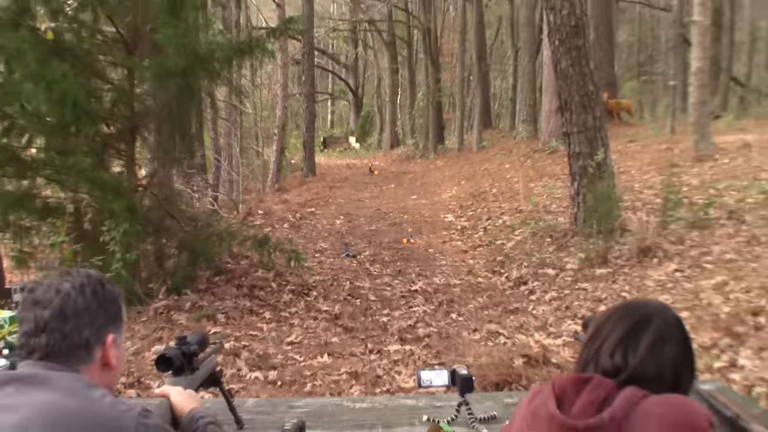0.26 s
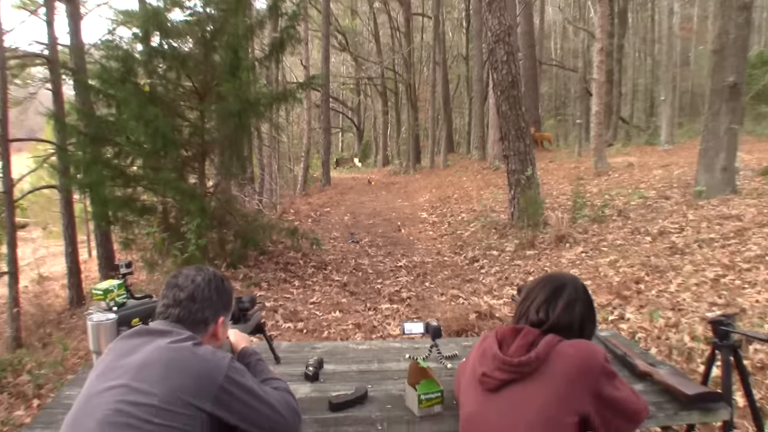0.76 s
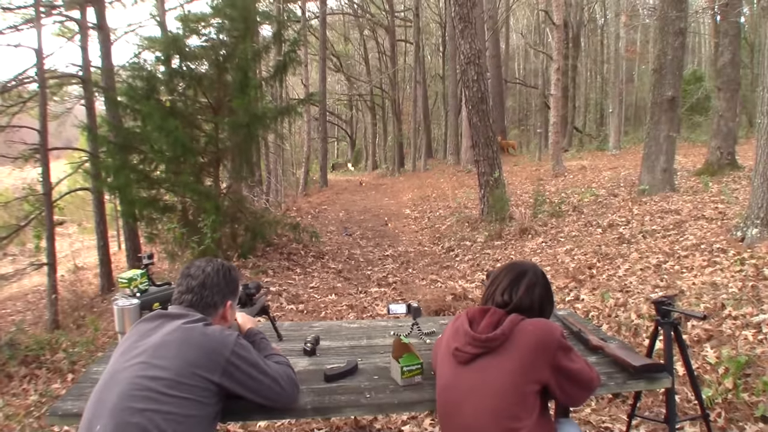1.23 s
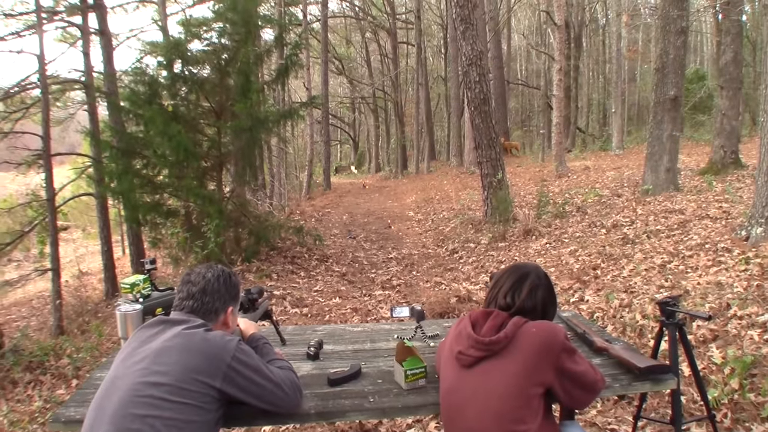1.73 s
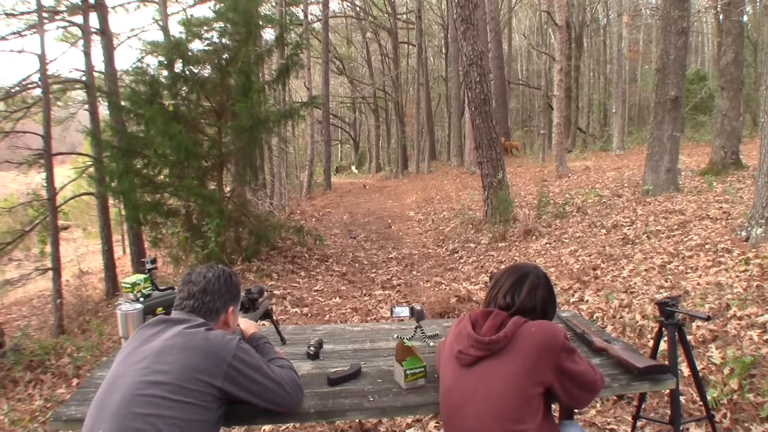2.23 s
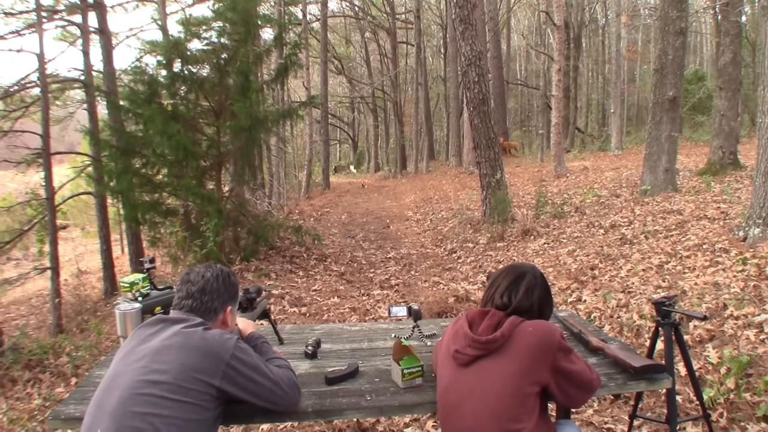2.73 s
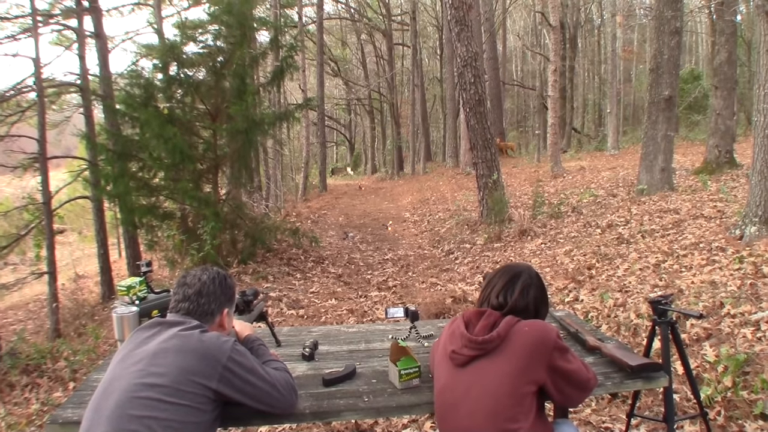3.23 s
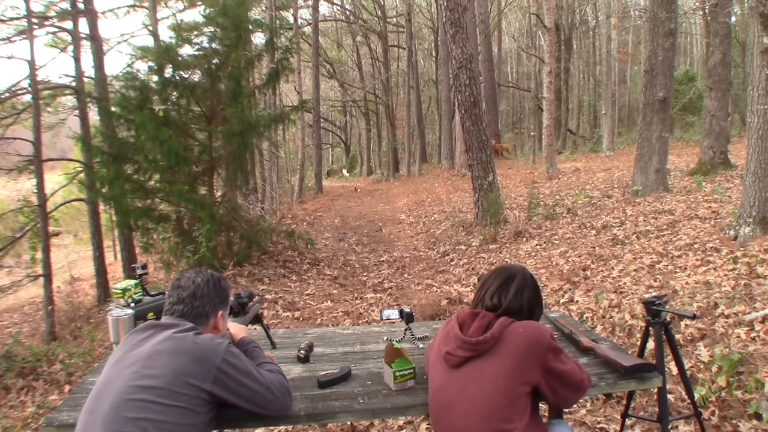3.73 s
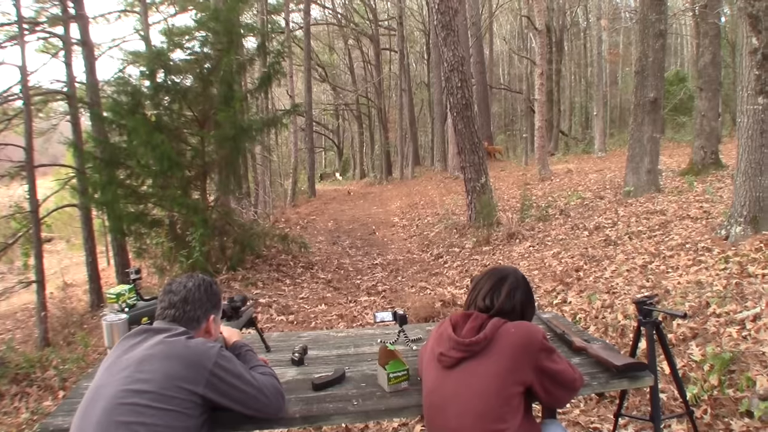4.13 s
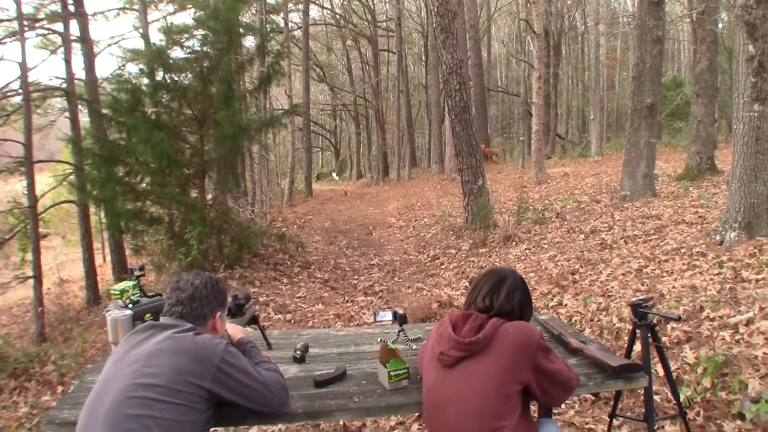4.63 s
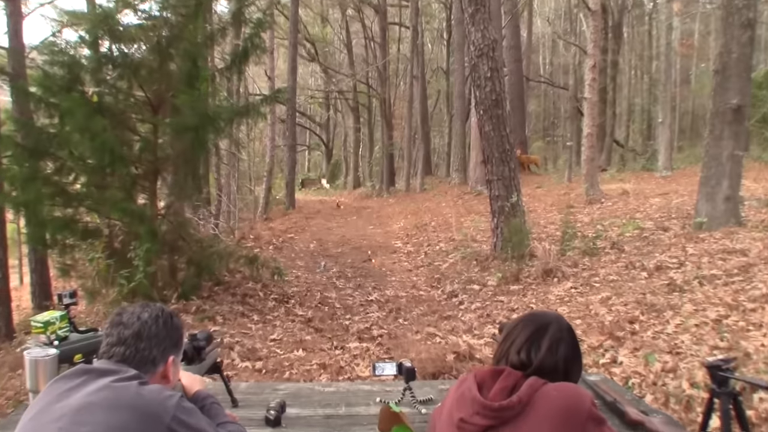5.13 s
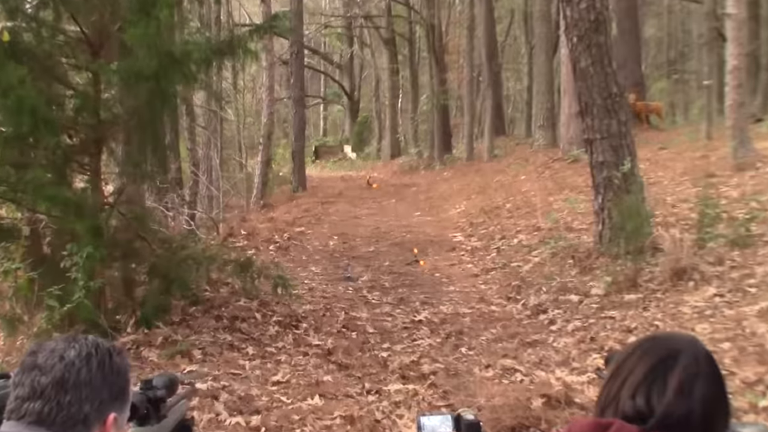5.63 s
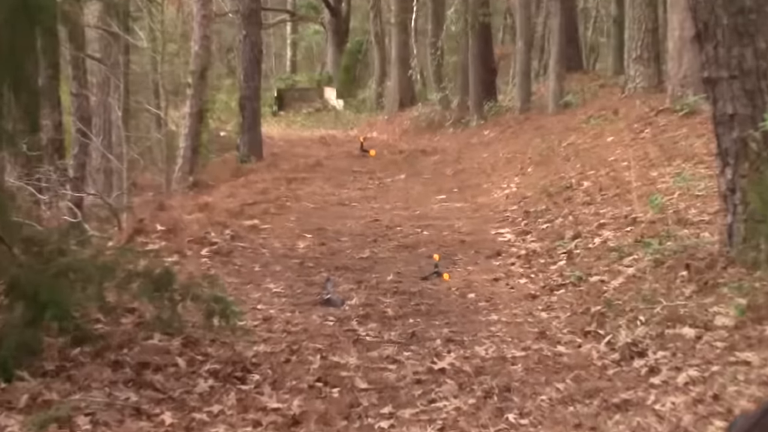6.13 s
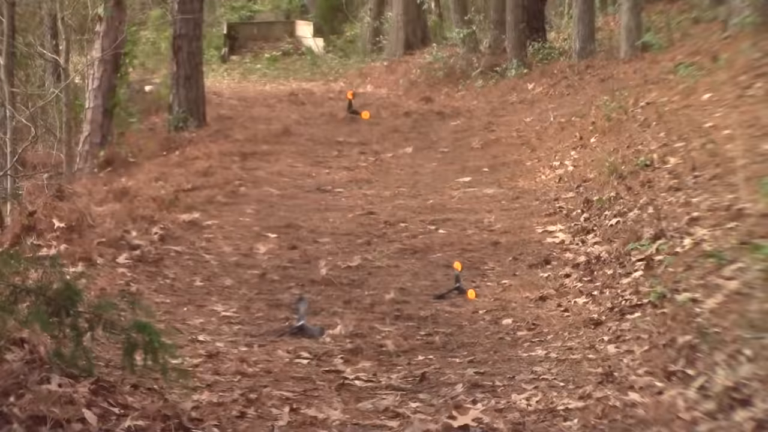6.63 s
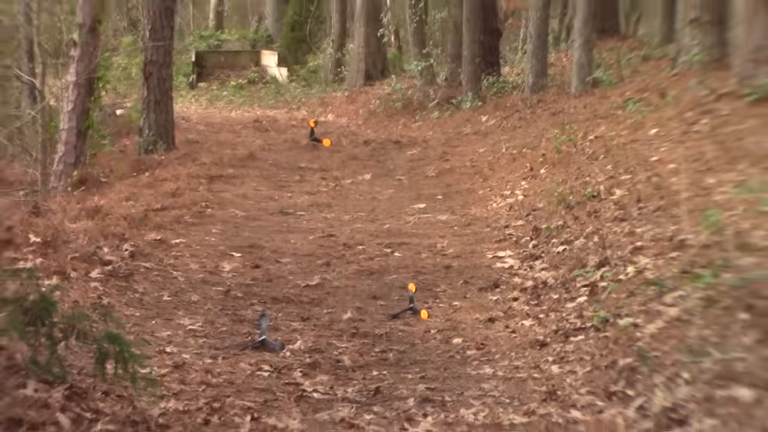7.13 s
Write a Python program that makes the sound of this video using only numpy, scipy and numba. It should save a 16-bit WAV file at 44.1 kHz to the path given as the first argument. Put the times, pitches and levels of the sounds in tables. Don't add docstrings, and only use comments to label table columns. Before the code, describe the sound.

Two small rifles crack irregularly in open woods, most shots answered by a bright steel ring and a rattling wash of tree echoes.

```python
import sys
import numpy as np
from scipy import signal
from scipy.io import wavfile
from scipy.ndimage import uniform_filter1d, minimum_filter1d
from numba import njit

SR = 44100
rng = np.random.default_rng(int(sys.argv[2]) if len(sys.argv) > 2 else 0)


def makeup_ratio(level_db):
    decades = np.asarray(level_db, float) / 20
    return 10 ** decades


def wav_out(sig):
    wavfile.write(sys.argv[1], SR, np.round(np.clip(np.atleast_2d(sig).T, -1, 1) * 32767).astype(np.int16))


N = 325017
AGE = np.arange(SR) / SR
LEAD = SR
DUCK_DB, RECOVER_S = 22, 0.27

# t/s, blast level/dB, woods level/dB, woods treble/dB
FIRST_SHOTS = [(0.341, -2, -0.5, 2.5), (1.388, -2, -0.5, -5.5), (2.4083, -0.5, 1, -2),
               (3.107, -2.5, -3, -2.5), (4.2760, -2, 0.5, -0.9), (4.5302, -4.5, 4, -7),
               (4.7600, -1.5, 2, -1.3), (5.3685, -2, 2, -2.6), (5.7456, -2, 1.5, -1.3),
               (6.9576, -2.5, 1.5, -1)]
SECOND_SHOTS = [(2.8146, 0.11, 0.087, 0.023), (5.0760, 0.0054, 0, -3.4), (6.389, 0.1, 0.2, 1)]
EARLIER_SHOT = (-0.995, 0, 0.23, .3)
# t from thump/ms, length/ms, f/Hz, width/Hz, level/dB
FIRST_BURSTS = [
    (-6.5, 2, 1200, 4000, -6),
    (-4, 1.8, 5200, 22000, 10),
    (-6, 15.2, 810, 2000, -7.5),
    (11.5, 41, 1100, 6200, -19),
    (15, 45, 6900, 3500, -50),
]
SECOND_BURSTS = [
    (-8.5, 5.3, 2700, 4400, -16),
    (-5, 3.1, 6000, 3800, 6.5),
    (-6.5, 15, 650, 1800, -8),
    (19.5, 18, 3600, 2300, -19.5),
    (22, 22, 7200, 1500, -22),
]
# f/Hz, level/dB, length/s
FIRST_THUMP = [(283.3, -0.5, 0.0084), (250, -17, 0.019), (611.5, -3, 0.0087), (1366, -9.5, 0.0045),
               (108, -27, 0.011)]
SECOND_THUMP = [(275, -1.5, 0.0063), (248.7, -17, 0.02), (559, -6.5, 0.0082), (1090, -5, 0.0045),
                (133, -15, 0.0061)]
# t after thump/s, girth level/dB, bright minus dull/dB
TRUNKS = [(.0145, 1, -2), (.0242, -7.5, -19), (.0368, -3, -13), (.048, 12, -2), (.0548, -1.5, -11),
          (.0671, -12, -7), (.083, 4.5, -3), (.088, -2, -4), (.0998, -17, 14), (.1104, 1, 2),
          (0.1186, -10, 16), (.1222, -0.5, 0.5), (.1294, 2, 0), (0.135, 0.5, -1.5), (.1529, 6.5, 1.5),
          (0.1826, 8.5, -0.5), (.196, 1, 11), (.2273, 4.5, 2), (.2388, 6.5, 4.5), (.244, 2.5, -2),
          (.2487, -12, -1), (.269, 5.5, -8), (.281, 3.5, -9), (.2935, -1, 5), (.3135, 4, -1),
          (.32, -7, -25.5), (.352, -0.5, -11), (.389, -1.5, -13), (.418, 6.5, -6.5), (.445, 2, 1)]
# f/Hz, width/Hz, level/dB, share of the trunk's tilt
TRUNK_BANDS = [
    (1044, 660, 0.5, -0.82),
    (2182, 890, 4, -0.11),
    (3740, 2020, -1, 0.54),
]
NEAR_TRUNK_DB, FARTHER_DB_PER_S = -7.5, -74
TRUNK_SPREAD_S, WIDER_PER_S = .0028, .01
# f/Hz, level/dB, t60/s
LEFT_A = [(2236, -20, .65), (3871, -25, .6), (7750, -29, .2), (7926, -18, .27), (8000, -31, .35),
          (8167, -32, .27), (9280, -19, .22), (9428, -33, .3), (11100, -31, .15), (11620, -43, .28),
          (13215, -37, .23)]
LEFT_B = [(3703, -31, .33), (3705, -33, 1.3), (5923, -23, .33), (5948, -23, .4), (7114, -33, .45),
          (7756, -25, .23), (7928, -32, .45), (8290, -37, .4), (9292, -43, .34), (10662, -35, .25),
          (13230, -40, .21)]
LEFT_C = [(2231, -21, .75), (3875, -29, .65), (5638, -25, .36), (5941, -29, .5), (7751, -31, .25),
          (7926, -24, .3), (8009, -37, .45), (8170, -38, .45), (9287, -15, .21), (9433, -32, .32),
          (11115, -27, .24), (11612, -38, .33), (12005, -35, .3), (13237, -34, .3)]
RIGHT_A = [(2067, -25, .7), (2298, -20, .78), (5696, -38, .78), (6031, -13, .33), (8050, -29, .33),
           (8152, -30, .42), (8308, -23, .4), (9446, -31, .41), (9601, -28, .21), (10957, -21, .29),
           (11858, -32, .29), (12238, -33, .42), (13428, -32, .5), (14749, -38, .5)]
RIGHT_B = [(2271, -24, .78), (2298, -23, .7), (3946, -26, .6), (5693, -32, .78), (5960, -27, .52),
           (7845, -18, .35), (8077, -32, .78), (9429, -15, .23), (9592, -18, .21), (10853, -17, .21),
           (11839, -21, .24), (13428, -31, .25), (13587, -27, .27), (14824, -33, .25)]
RIGHT_C = [(2298, -28, .7), (8061, -23, .5), (8322, -26, .21), (9603, -40, .37), (13596, -36, .4),
           (14751, -41, .36), (14862, -44, .3)]
SOIL = []
# t/s, splash level/dB, paddle, ring level/dB, f favoured by the spot/Hz, its boost/dB
STRIKES = [(.3986, 2.5, LEFT_A, -1.5, 7923, 1), (1.4483, -0.5, LEFT_B, 0, 5923, 6.5),
           (2.4668, -8.5, LEFT_B, -4, 5951, 6), (2.864, -4, RIGHT_A, -0.5, 6031, -0.3),
           (3.1683, -1, LEFT_C, -1.5, 7751, 10.5), (4.3356, -5, LEFT_A, -4.5, 7750, 21),
           (4.5903, -15.5, SOIL, 0, 0, 0), (5.1278, -3.5, RIGHT_B, -0.7, 9429, 0.5),
           (5.4268, -10, SOIL, 0, 0, 0), (5.8048, 4, LEFT_C, -4, 2238, 2.5),
           (6.439, -16, RIGHT_C, 1.7, 8055, -3), (7.0176, -7, LEFT_A, -5, 2239, 3)]
# t/s, level/dB, t60/s
LEAVES = [(1.054, -24.5, 0.1), (1.8472, -27, 0.095), (3.5773, -29.5, 0.14), (3.7688, -22, 0.12),
          (4.18, -40.5, 0.47)]
# t/s, level/dB, f/Hz, left minus right/dB
TICKS = [(0.2274, -37, 7600, -1.5), (0.9494, -31, 4520, 15), (2.155, -21, 8750, -4.5),
         (2.2767, -38.5, 4600, 1), (3.7205, -27, 4440, 1.0), (3.9944, -42, 4500, 11),
         (4.132, -35, 4590, -3), (4.173, -30, 5570, 5.5), (4.185, -8.5, 7400, 3.5), (4.2, -18, 5380, -2),
         (4.2158, -29, 8370, -9), (4.2305, -34, 5617, 15), (6.3072, -24, 6450, 5)]
CRACKLE_PER_S, CRACKLE_DB = 140, -58
# t/s, level/dB, f from/Hz, f to/Hz
CHIRPS = [(1.335, -49, 7000, 8100), (3.705, -49, 7300, 8000), (3.96, -57, 7400, 8000),
          (4.261, -22, 6900, 7690)]
# f/Hz, level/dB per Hz
WOODS_COLOUR = [(60, -78), (1200, -57), (1724, -59.5), (2210, -51), (3100, -62.5), (4100, -59),
                (10500, -63), (16000, -79)]
# f/Hz, early t60/s, late level/dB, late t60/s, build-up/s
WOODS_DECAY = [(60, 0.51, -32, 2.7, 0.028), (250, 0.75, -29.5, 14.3, 0.031), (1280, 0.53, -21, 6.27, 0.099),
               (2220, 0.61, -24.5, 3.5, 0.072), (4500, .72, -14.5, 1.32, 0.002),
               (8000, 0.54, -41.5, 2.06, 0.0023), (16000, 0.18, -42, 0.36, .003)]
# f/Hz, level/dB per Hz
AIR = [(40, -104), (150, -110), (400, -114), (1500, -108), (4000, -124), (9000, -127), (16000, -140)]
# f/Hz, likeness/0-1
LIKENESS = [(60, 0.97), (250, 1), (2000, 0.96), (6000, 0.87), (14000, 0.89)]


def rifle(shots, bursts, modes, lead_s, scatter_db=1.64):
    out = np.zeros((2, N))
    facets = np.sort(rng.random((len(TRUNKS), 11)))
    echoes = [trunk(tilt_db, facet, TRUNK_SPREAD_S + WIDER_PER_S * lag)
              for (lag, _, tilt_db), facet in zip(TRUNKS, facets)]
    thump = pressure_thump(modes)
    for s, blast_db, woods_db, _ in shots:
        for ms, length_ms, hz, width, db in bursts:
            puff = muzzle_burst(length_ms, hz, width)
            add(out, s + ms / 1000, makeup_ratio(db + blast_db) * puff)
        add(out, s - lead_s, makeup_ratio(blast_db) * thump[None])
        for (lag, girth_db, _), parts in zip(TRUNKS, echoes):
            echo = makeup_ratio(scatter_db * rng.standard_normal(len(parts))) @ parts
            echo_db = NEAR_TRUNK_DB + FARTHER_DB_PER_S * lag + girth_db + woods_db
            add(out, s + lag - .0016, makeup_ratio(echo_db) * echo[None])
    return out


def muzzle_burst(length_ms, hz, width):
    n = int(length_ms * SR / 1000)
    noise = rng.standard_normal((2, n)) * [[1], [.15]]
    mid, side = band(noise, hz, width) * np.sqrt(SR / 2 / width) * np.hanning(n) ** .5
    return mid + side * [[1], [-1]]


def pressure_thump(modes):
    sag = AGE + 0.27 * 0.0045 * (1 - np.exp(-AGE / 0.0037))
    thump = sum(makeup_ratio(db) * np.cos(2 * np.pi * hz * sag) * np.exp(-(AGE / length) ** 2)
                for hz, db, length in modes)
    return band(thump, 1500, 12000)


def trunk(tilt_db, facets, spread_s):
    pulses = np.zeros(800)
    arrivals = ((facets - facets[0]) * spread_s * SR).astype(int)
    pulses[arrivals] = (-.87) ** np.arange(len(facets))
    parts = np.array([band(pulses, hz, width, order=3) * makeup_ratio(db + share * tilt_db) / width
                      for hz, width, db, share in TRUNK_BANDS])
    return parts / np.abs(parts.sum(axis=0)).max()


def steel():
    out = np.zeros((2, N))
    for s, splash_db, paddle, ring_db, spot_hz, boost_db in STRIKES:
        modes = [(hz, db + ring_db + boost_db * (abs(hz - spot_hz) < 10), t60) for hz, db, t60 in paddle]
        spray = (AGE < .0018) + 0.13 * 1000 ** (-AGE / .03)
        splash = band(rng.standard_normal(len(AGE)) * spray, 6300, 7500, order=2)
        add(out, s - .0004, makeup_ratio(splash_db) * splash[None], .5)
        onset = 1 - np.exp(-AGE / 0.001)
        add(out, s + .001, onset * ring(modes)[None], .5)
    return out


def ring(modes, swing_s=0.2, late_db=-12, ring_db=-5.0, treble_db=-0.54, sustain=1.44, tail_db=-22,
         longer=2.4):
    out = np.zeros(len(AGE))
    for hz, db, t60 in modes:
        phase, rock, turn = rng.random(3)
        rock_hz = 5 + 16 * rock
        waver = 1 + min(hz / 9000, .5) * np.sin(2 * np.pi * (rock_hz * AGE + turn))
        size = makeup_ratio(db + ring_db + treble_db * np.log2(hz / 4000))
        decay = 1000 ** (-AGE / (sustain * t60)) + makeup_ratio(tail_db) * 1000 ** (-AGE / (longer * t60))
        out += size * waver * np.sin(2 * np.pi * (hz * AGE + phase)) * decay
    return out * (np.exp(-(AGE / swing_s) ** 3) + makeup_ratio(late_db))


def cases_in_leaves():
    out = np.zeros((2, N))
    for s, db, t60 in LEAVES:
        grains = rng.standard_normal((2, len(AGE))) * makeup_ratio(1.5 * rng.exponential(size=len(AGE)))
        rustle = band(grains * [[1], [.3]], 7200, 7600, order=2)
        mid, side = rustle * (1 - np.exp(-AGE / 0.0017)) * 1000 ** (-AGE / t60)
        add(out, s - .002, makeup_ratio(db - 3.0) * (mid + side * [[1], [-1]]))
    return out


def case_ticks():
    out = np.zeros((2, N))
    for s, db, hz, pan_db in TICKS:
        tick = band(rng.standard_normal(len(AGE)) * 1000 ** (-AGE / 0.011), hz, 3900, order=2)
        add(out, s, makeup_ratio(db - 2) * tick[None], pan_db)
    return out


def leaf_crackle():
    out = np.zeros((2, N))
    for when, size, side in rng.random((int(CRACKLE_PER_S * N / SR), 3)):
        snap = band(rng.standard_normal(600) * 1000 ** (-AGE[:600] / .012), 8500, 7000, order=2)
        add(out, when * N / SR, makeup_ratio(CRACKLE_DB - 3.1 * np.log(size)) * snap[None], 12 * (side - .5))
    return out


def rising_whistles():
    out = np.zeros((2, N))
    glide = np.linspace(0, 1, int(0.02 * SR))
    for s, db, hz_from, hz_to in CHIRPS:
        hz = hz_from + (hz_to - hz_from) * glide ** .6
        whistle = np.sin(2 * np.pi * np.cumsum(hz[None]) / SR)
        add(out, s, makeup_ratio(db) * np.sin(np.pi * glide) * whistle)
    return out


def woods(lumps_db=2.5, grain_db=1.):
    blasts, treble, out = np.zeros(N + LEAD), np.zeros(N + LEAD), 0
    for s, _, db, treble_db in FIRST_SHOTS + SECOND_SHOTS + [EARLIER_SHOT]:
        i = int(s * SR) + LEAD
        blasts[i], treble[i] = makeup_ratio(2 * db), makeup_ratio(2 * (db + treble_db))
    lumps = flicker(120) * np.clip(fade(blasts, 2.5)[LEAD:] * 5, .25, 1)
    for hz in 40 * 2 ** np.arange(0, 8.7, 1 / 3):
        early, late_db, late, build = at_pitch(WOODS_DECAY, hz)
        (db,), (air_db,), (like,) = (at_pitch(table, hz) for table in (WOODS_COLOUR, AIR, LIKENESS))
        kick = treble if hz > 2400 else blasts
        power = fade(kick, early) + makeup_ratio(2 * late_db) * fade(kick, late)
        keep = np.exp(-1 / (max(build, .001) * SR))
        power = signal.lfilter([1 - keep], [1, -keep], power)[LEAD:]
        power = makeup_ratio(2 * db) * power + makeup_ratio(2 * air_db)
        mid, side = band(rng.standard_normal((2, N)), hz, hz * 0.22, order=2)
        share = np.clip(like, 0, 1)
        pair = np.sqrt(1 + share) * mid + np.sqrt(1 - share) * side * np.array([[1], [-1]])
        uneven = makeup_ratio(lumps_db * lumps * (500 < hz < 9000) + grain_db * flicker(30))
        out = out + np.sqrt(power * SR / 4) * uneven * pair
    return out


def at_pitch(table, hz):
    table_hz, *columns = np.transpose(table)
    return [np.interp(np.log(hz), np.log(table_hz), column) for column in columns]


def fade(x, t60):
    return signal.lfilter([1], [1, -1000 ** (-2 / (t60 * SR))], x)


def flicker(rate):
    k = int(SR / rate)
    return uniform_filter1d(np.repeat(rng.standard_normal(N // k + 1), k), k)[:N]


def band(x, hz, width, order=1):
    lo = np.sqrt(hz ** 2 + width ** 2 / 4) - width / 2
    edges = [lo, min(lo + width, .45 * SR)]
    return signal.sosfilt(signal.butter(order, edges, "band", fs=SR, output="sos"), x)


def add(out, s, sound, pan_db=0):
    i = int(s * SR)
    n = max(min(sound.shape[-1], N - i), 0)
    out[:, i:i + n] += sound[..., :n] * makeup_ratio(np.array([[pan_db / 2], [-pan_db / 2]]))


@njit
def follow(x, release):
    e, y = 0., np.empty(len(x))
    for i in range(len(x)):
        e = max(x[i], e * release)
        y[i] = e
    return y


def scene():
    first = rifle(FIRST_SHOTS, FIRST_BURSTS, FIRST_THUMP, lead_s=.0024)
    second = rifle(SECOND_SHOTS, SECOND_BURSTS, SECOND_THUMP, lead_s=.0039)
    small = (cases_in_leaves() + case_ticks() + leaf_crackle() + rising_whistles()) * makeup_ratio(-DUCK_DB)
    return first + second + steel() + small + woods()


def top_cut(x):
    return signal.sosfilt(signal.butter(12, 16430, fs=SR, output="sos"), x)


def record(dry):
    t = np.arange(N) / SR
    starts = np.sort([-1.] + [s - .0075 for s, *_ in FIRST_SHOTS + SECOND_SHOTS])
    age = t - starts[np.searchsorted(starts, t) - 1]
    x = dry * makeup_ratio(DUCK_DB * np.clip(age / RECOVER_S, 0, 1))
    peak = -minimum_filter1d(-np.abs(x).max(axis=0), size=40)
    over = np.maximum(follow(peak, np.exp(-1 / (.005 * SR))) / 1.05, 1)
    strength = np.where(age < .011, .45, .8)
    x = x / uniform_filter1d(over, size=40) ** strength
    low_pass = signal.ellip(8, .2, 60, 15700, fs=SR, output="sos")
    x = signal.sosfilt(low_pass, np.clip(x, -.97, .97))
    return top_cut(x)


dry = scene()
out = record(dry)
wav_out(out)
```